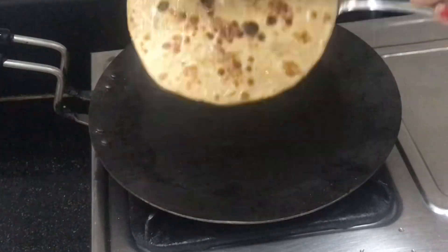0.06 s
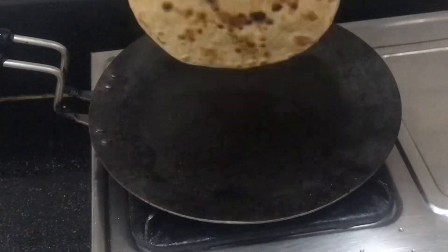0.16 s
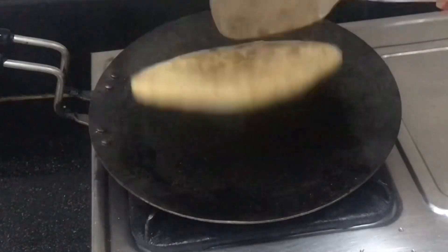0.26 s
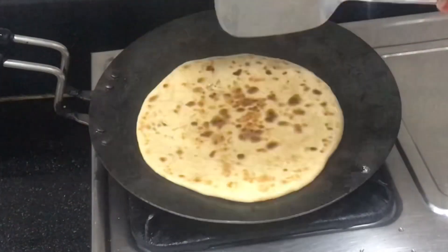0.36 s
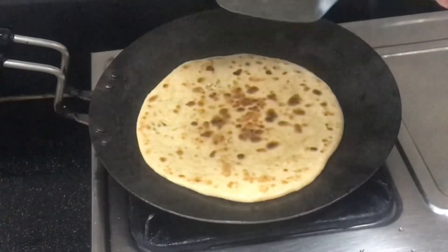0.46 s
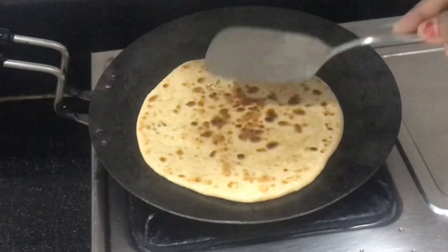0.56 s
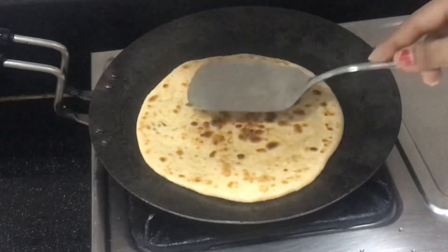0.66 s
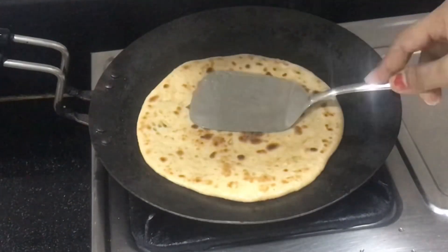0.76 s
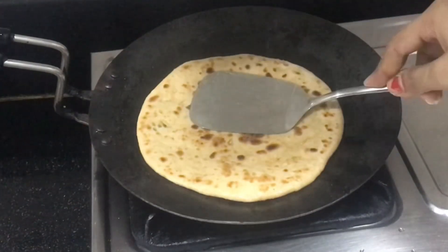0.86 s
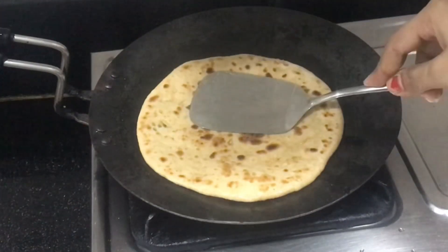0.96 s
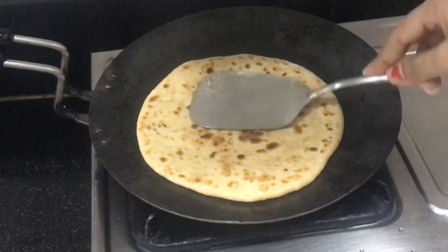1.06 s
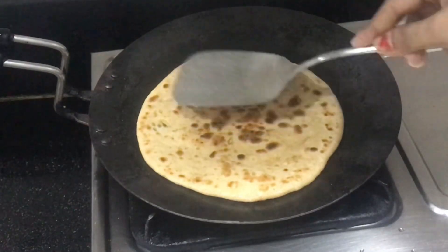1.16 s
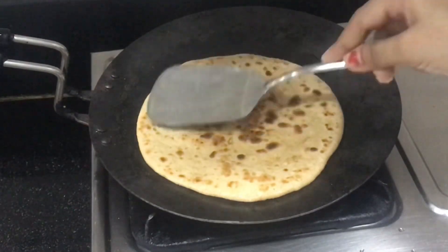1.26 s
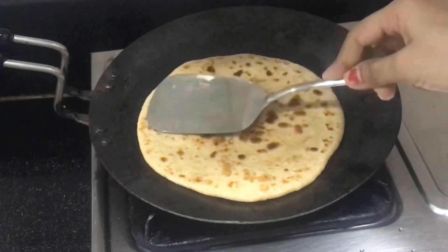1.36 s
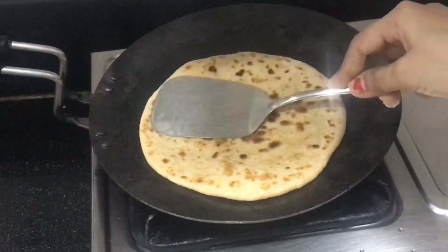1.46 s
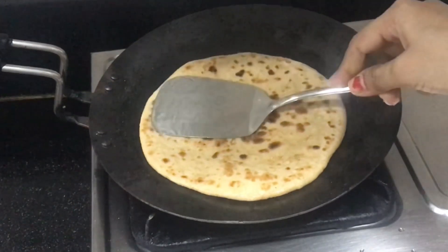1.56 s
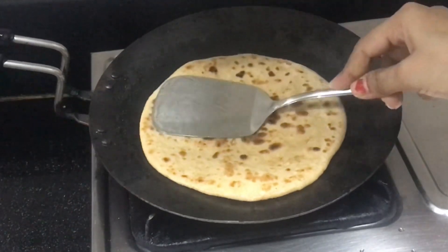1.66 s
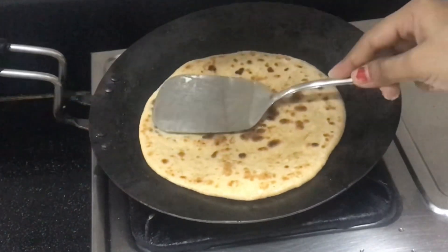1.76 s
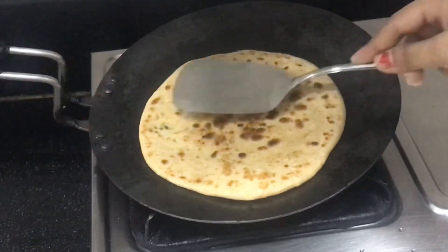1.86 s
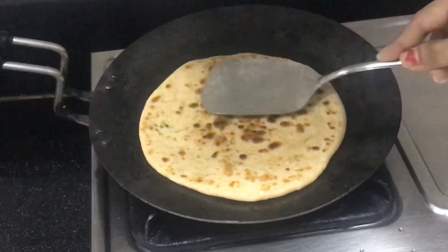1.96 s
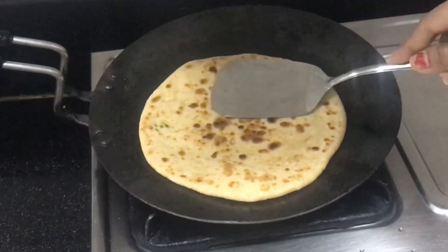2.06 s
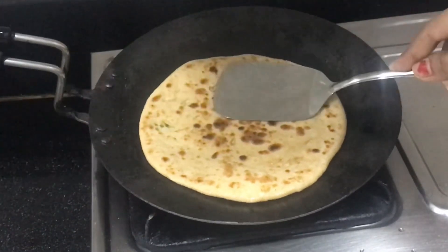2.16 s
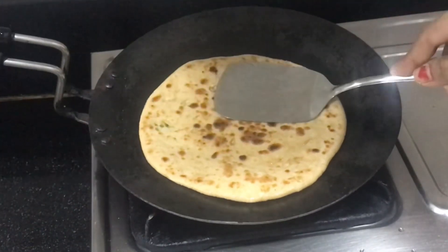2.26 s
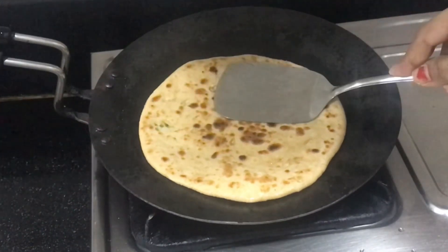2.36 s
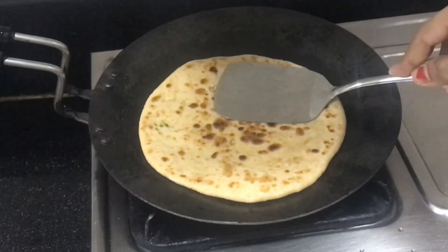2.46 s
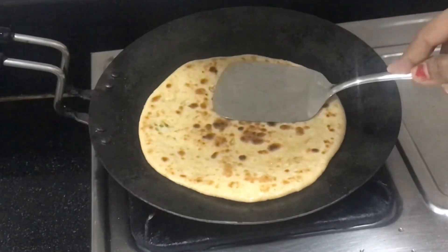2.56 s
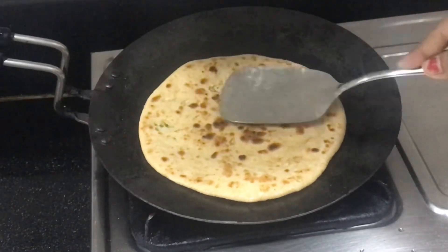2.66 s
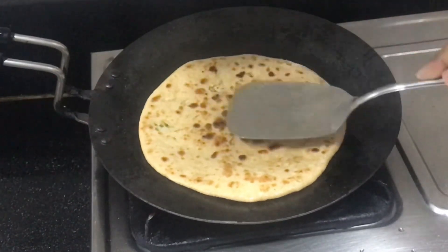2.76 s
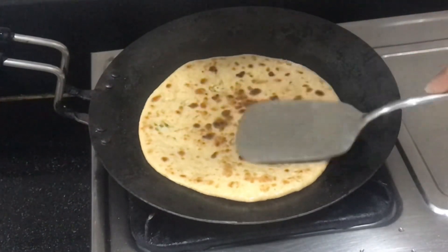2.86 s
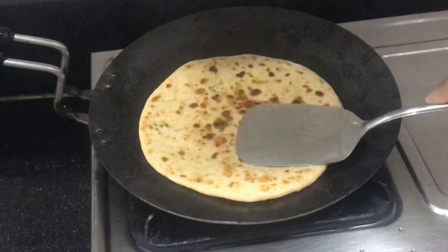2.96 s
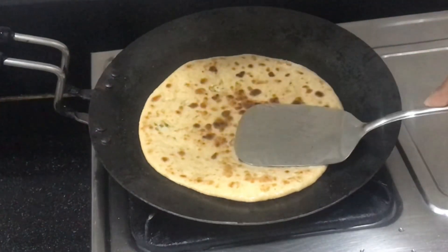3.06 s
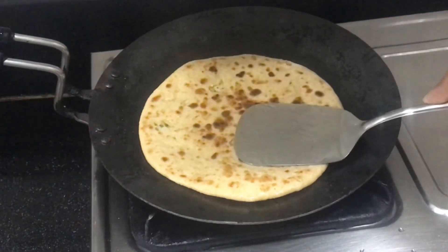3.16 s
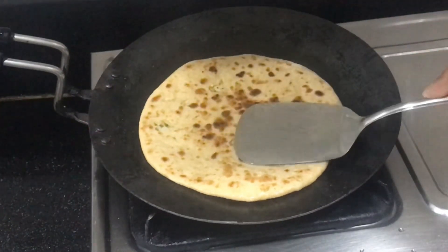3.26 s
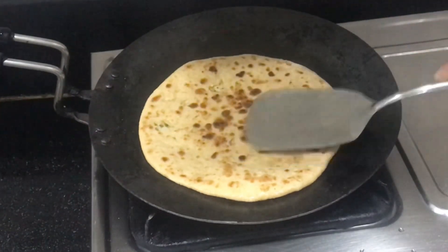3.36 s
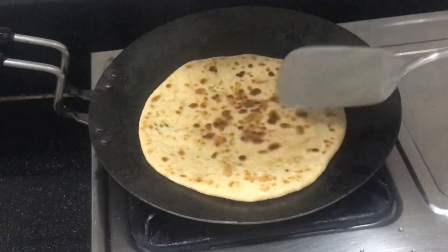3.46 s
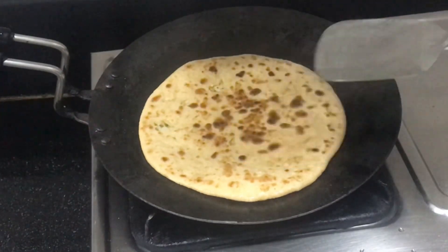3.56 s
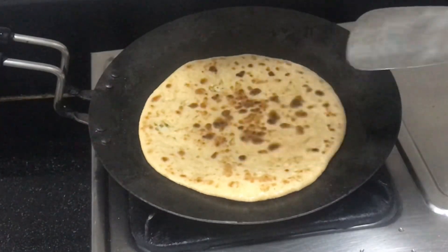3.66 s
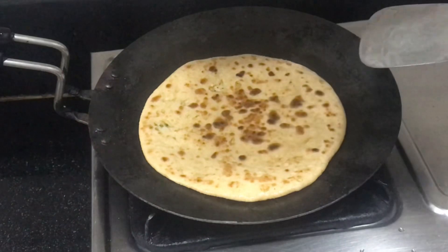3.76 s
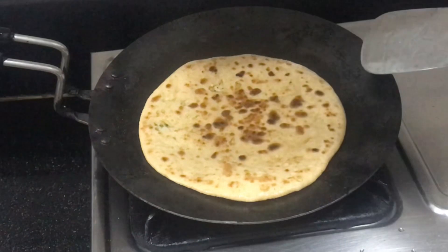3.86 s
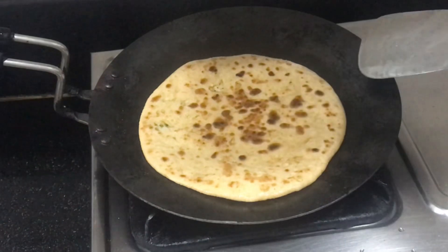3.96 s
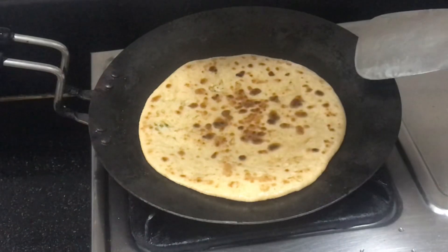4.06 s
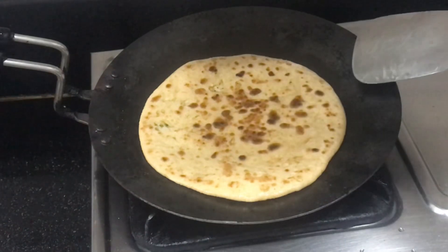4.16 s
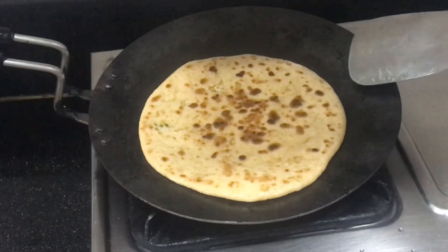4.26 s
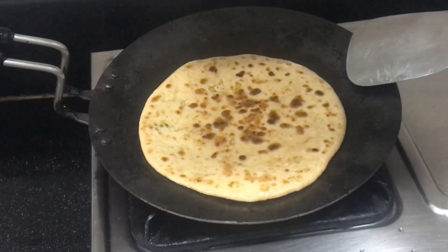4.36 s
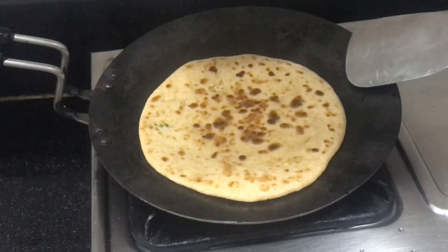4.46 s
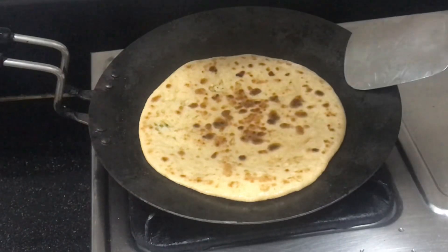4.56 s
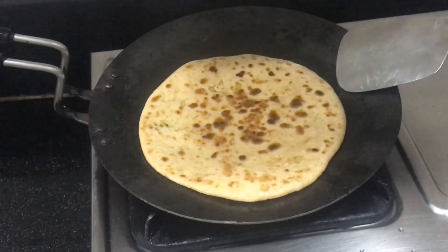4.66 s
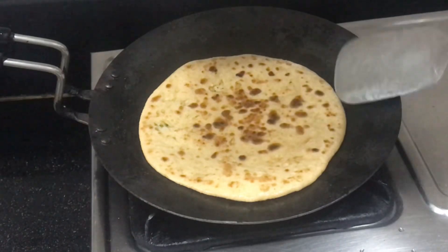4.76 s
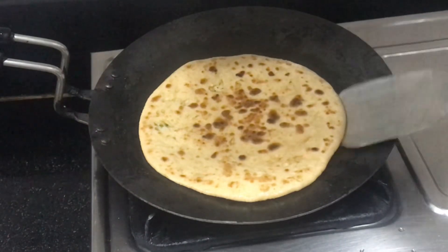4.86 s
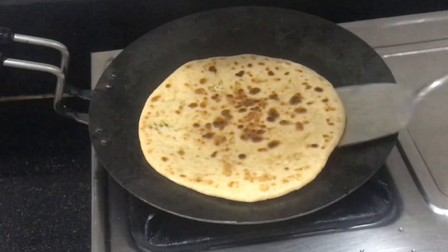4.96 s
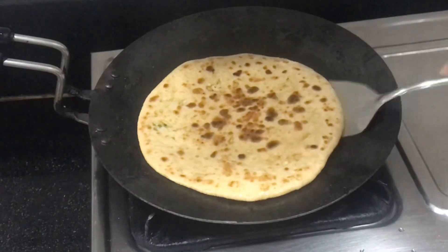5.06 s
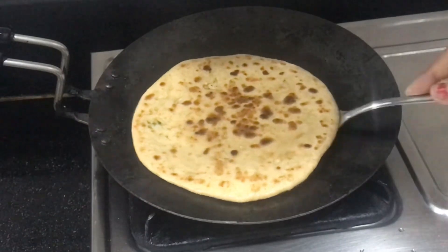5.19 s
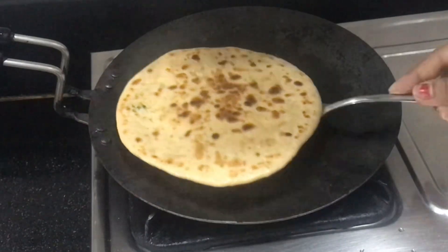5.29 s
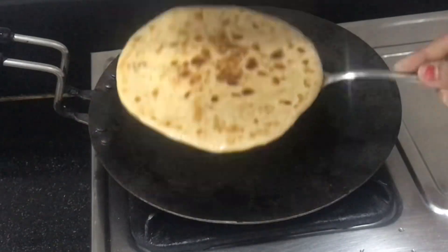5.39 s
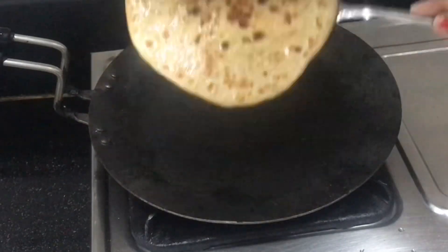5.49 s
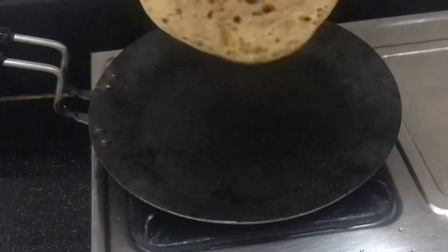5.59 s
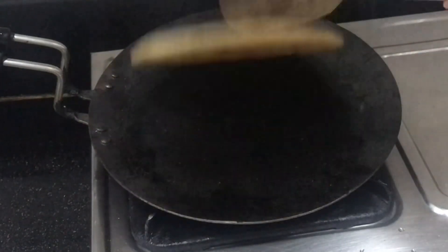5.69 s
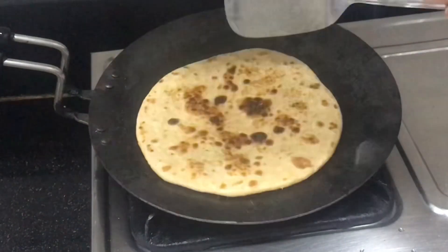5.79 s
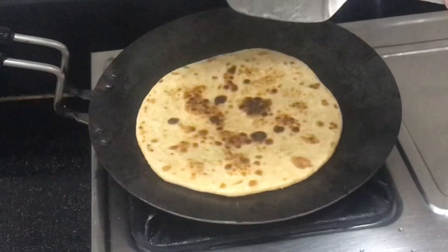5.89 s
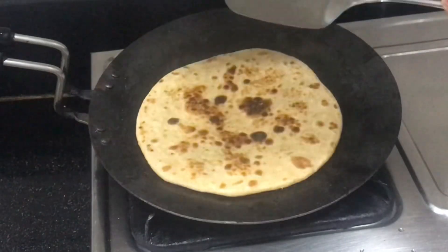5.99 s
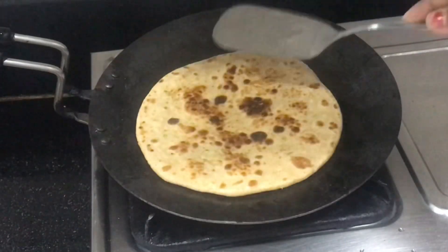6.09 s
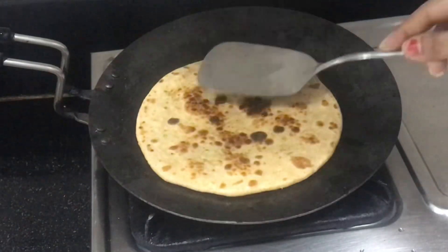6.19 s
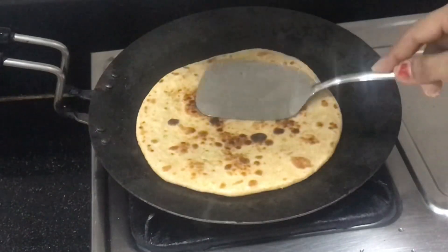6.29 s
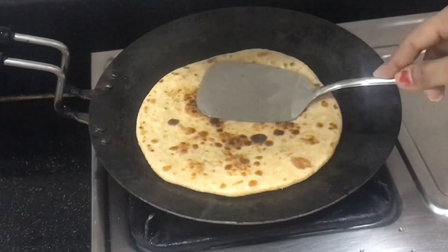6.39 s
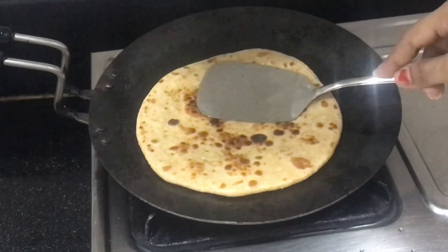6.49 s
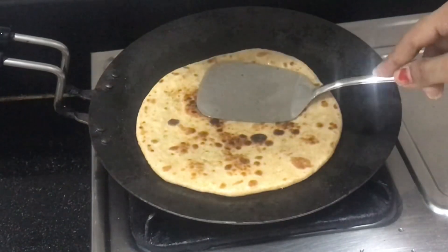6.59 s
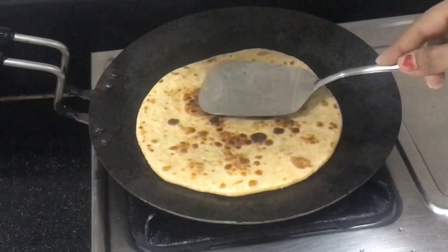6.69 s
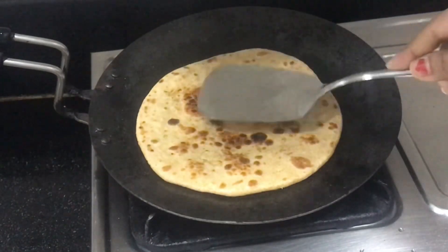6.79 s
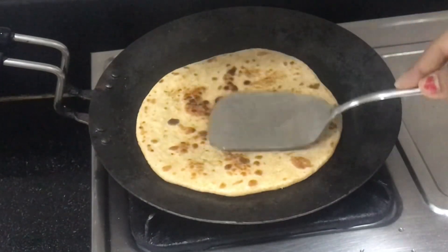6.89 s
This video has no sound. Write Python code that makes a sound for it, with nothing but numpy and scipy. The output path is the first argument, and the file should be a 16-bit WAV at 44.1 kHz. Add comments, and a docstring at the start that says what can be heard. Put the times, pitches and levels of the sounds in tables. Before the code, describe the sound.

Close in a home kitchen, a flatbread slaps onto a hot iron griddle and sizzles. A steel spatula pats and knocks it, each press making the oil flare brightly. Thin steam whistles sag and oil spits snap. The frying thins out, then the blade scrapes gritty and ringing under the bread, which flips and slaps down again before more soft pressing. Low burner rumble throughout.

```python
"""An oiled flatbread sizzles on a hot iron griddle while steam whistles thinly and a gas burner rumbles below.
A steel spatula pats and knocks the pan; the flipped bread slaps down twice, and later the blade scrapes under it.
Frying is made of random clicks, steam of sagging tones, and the burner of shaped noise with a wavering hum.
Blows are bursts of shaped noise plus ringing tones; oil spits are snaps with a brief sputter.
The scrape is a stream of random slips that rings the blade's resonances."""
import sys
import numpy as np
from scipy import signal
from scipy.fft import rfft, irfft
from scipy.io import wavfile

SR = 44100
rng = np.random.default_rng(int(sys.argv[2]) if len(sys.argv) > 2 else 0)


def transcribe(u):
    """Save the signal u as a 16-bit wav file named by the first command-line argument.

    u: samples, shape (n,) or (channels, n), limited to [-1, 1]; the rate is SR.
    q: integer samples, one column per channel.
    """
    v = np.clip(np.atleast_2d(u).T, -1, 1)
    q = np.round(v * 32767).astype(np.int16)
    wavfile.write(sys.argv[1], SR, q)


N = 305613
TIME = np.arange(N) / SR  # seconds
FREQS = np.fft.rfftfreq(2 * N, 1 / SR)  # Hz

# pushes of the blade under the bread:
# start_s, length_s, ringing_db (before the mix), rasp_db (gritty rasp compared with the ringing)
STROKES = [(4.634, 0.18, -40, -20), (4.782, .18, -35, -7), (4.96, 0.09, -27.5, -1.5),
           (5.155, 0.029, -31.5, -13), (5.273, 0.044, -49.5, 7.5)]


def undb(db):
    """Turn decibels into a gain."""
    return 10 ** (np.asarray(db) / 20)


def unit(x):
    """Scale to an rms (average strength) of 1."""
    return x / np.sqrt(np.mean(x ** 2))


def unit_gain(response):
    """Rms gain that a response gives to white noise."""
    return np.sqrt(np.mean(np.abs(response) ** 2))


def add(out, start_s, x):
    """Mix x into out from a given time."""
    i = max(int(start_s * SR), 0)
    out[i:i + len(x)] += x[:max(len(out) - i, 0)]


def filtered(x, response):
    """Apply a frequency response."""
    return irfft(rfft(x, 2 * N) * response)[:N]


def colour(points):
    """Frequency response through (pitch_hz, level_db) points that never sounds ahead of its input."""
    hz, db = np.transpose(points)
    level_db = np.interp(np.log(FREQS + 1), np.log(hz), db)
    # folding the cepstrum forward in time makes the response causal
    cepstrum = irfft(np.log(undb(level_db)))
    cepstrum[1:N] *= 2
    return np.exp(rfft(cepstrum[:N], 2 * N))


def resonances(rows):
    """Response of (pitch_hz, width_hz, level_db) resonances side by side."""
    total = 0
    for hz, width_hz, db in rows:
        loss = 1j * FREQS * width_hz
        total = total + undb(db) * loss / (hz * hz - FREQS ** 2 + loss)
    return total


def walk(rate):
    """Random wander along straight lines, `rate` new points a second, with a spread near 1."""
    knots = rng.standard_normal(4096)
    return 1.264 * np.interp(TIME * rate, np.arange(len(knots)), knots)


def clicks(rate, spread_db):
    """Random clicks, about `rate` a second, a few of them much larger than the rest."""
    size = undb(spread_db * np.minimum(rng.exponential(size=N), 5.5))
    happens = rng.random(N) < rate / SR
    return happens * rng.choice([-1, 1], N) * size


def ring(modes):
    """Struck tones (pitch_hz, starting rms level_db, t60_s to drop 60 dB) dying away."""
    t = TIME[:SR]
    total = 0
    for hz, db, t60 in modes:
        strength = np.sqrt(2) * undb(db - 60 * t / t60)
        total = total + strength * np.sin(2 * np.pi * (hz * t + rng.random()))
    return total


def kitchen(x, near_db, tail_db, near_t60=0.054, tail_t60=0.51):
    """Direct sound, quick reflections off pan and stove, and the tail of the room; keeps the power."""
    t = TIME[:SR // 2]
    response = (t == 0) * 1.
    for db, t60 in ((near_db, near_t60), (tail_db, tail_t60)):
        echo = rng.standard_normal(len(t)) * undb(-60 * t / t60) * (t > .0003)
        response = response + undb(db) * echo / np.linalg.norm(echo)
    return signal.fftconvolve(x, response / np.linalg.norm(response))[:N]


def swell(top_s, rise_s, fade_s):
    """Envelope that swells to 1 at its top and then dies away."""
    since = TIME - top_s
    return np.exp(-np.where(since < 0, (since / rise_s) ** 2, since / fade_s))


def bubbling(db, points, count=4):
    """Tiny steam bubbles burst all round the bread: fine fizz and coarser crackle, denser as it fries harder."""
    busy = undb(.6 * (db + 42))  # density is 1 at -42 dB
    gain = undb(db + 3.0 * walk(35))
    out = 0
    for _ in range(count):  # each place on the pan has its own reflections
        fizz = unit(clicks(2000 * busy, spread_db=2.5) / np.sqrt(busy))
        crackle = unit(clicks(110 * busy, spread_db=6.5) / np.sqrt(busy))
        bubbles = fizz + undb(-6.0) * crackle
        out = out + kitchen(bubbles * gain, near_db=-3.0, tail_db=-3)
    oil = colour(points)
    return filtered(out, oil / unit_gain(oil)) / np.sqrt(count)


def sizzle():
    """Frying that fades as the bread dries; every press squeezes out steam, flares brightly, then boils off."""
    # frying level from the start and after each landing: start_s, level_db (before the mix)
    frying_levels = [(0.0, -44.5), (0.36, -42), (5.8, -48.5)]
    # pressing or prising the bread makes the oil flare up: top_s, level_db (before the mix), swell_s, fade_s
    presses = [(0.846, -25, 0.032, 0.12), (2.36, -34, 0.085, 0.033), (3.1, -47.5, 0.07, 0.16),
               (4.98, -29.5, 0.096, .11), (5.299, -40.5, 0.14, 0.07), (5.905, -41, 0.016, 0.011),
               (6.408, -31, 0.06, 0.069)]
    # tone colour of the bursting oil bubbles: pitch_hz, level_db (relative)
    fizz_colour = [(290, -33), (500, -27), (677, -29), (1010, -14), (1660, -18), (3670, -12), (5050, -12.5),
                   (5920, -8.5), (7900, -10.5), (8610, -6.5), (12000, -6.5), (15800, 0)]
    # tone colour of the flares: pitch_hz, level_db (relative)
    flare_colour = [(1500, -30), (4000, -11.5), (6000, -7.5), (10000, -6), (12500, 1), (15800, 2.5)]
    drying_db_per_s = 2
    # pressed-out moisture boils off later, weaker and slower than the flare
    boil_lag_s, boil_db, boil_slower = 0.13, -12.5, 2.6

    frying, flare, boil = np.zeros(N), 1e-4, 0
    for start_s, db in frying_levels:
        fading = undb(db - drying_db_per_s * (TIME - start_s))
        frying = np.where(TIME >= start_s - .002, fading, frying)
    for top_s, db, rise_s, fade_s in presses:
        flare = flare + undb(db) * swell(top_s, rise_s, fade_s)
        slow_swell = swell(top_s + boil_lag_s, rise_s * boil_slower, fade_s * boil_slower)
        boil = boil + undb(db + boil_db) * slow_swell
    frying_db = 20 * np.log10(np.hypot(frying, boil) + 1e-6)
    flare_db = 20 * np.log10(flare)
    steady = undb(2.65) * bubbling(frying_db, fizz_colour)
    return steady + undb(2.5) * bubbling(flare_db, flare_colour, count=2)


def whistles():
    """Steam through pinholes in the crust: thin wavering tones that sag as the steam pressure drops."""
    # start_s, length_s, start_pitch_hz (before wavering), level_db (peak before flutter),
    # sag (share of the pitch lost by the end)
    steam_jets = [(0.0, 0.54, 4270, -58.5, 0.065), (0.484, 0.39, 3610, -55, .01),
                  (0.579, 0.21, 3880, -59, 0.052), (1.078, 0.24, 3750, -51.5, .07),
                  (1.274, 0.19, 3590, -55.5, 0.011), (1.825, 0.14, 4880, -62.5, 0.057),
                  (1.9, 0.087, 9494, -55, .04), (3.218, 0.15, 9600, -58, 0.0092),
                  (3.812, 0.08, 5340, -58, 0.0078), (4.087, 0.48, 15500, -50, 0.16)]
    out = np.zeros(N)
    waver = 1 + 0.0078 * walk(35) + 0.0057 * walk(600)
    flutter = undb(2.2 * walk(45))
    for start_s, length_s, start_hz, db, sag in steam_jets:
        u = np.linspace(0, 1, int(length_s * SR))  # progress through the whistle
        waver_here = np.roll(waver, -int(start_s * SR))[:len(u)]
        hz = start_hz * (1 - sag * u) * waver_here
        tone = np.sin(2 * np.pi * np.cumsum(hz) / SR)
        add(out, start_s, undb(db) * np.sqrt(4 * u * (1 - u)) * tone)
    return out * flutter


def burner():
    """Low flame rumble from shaped noise, and a wavering motor hum in the kitchen."""
    # tone colour of the rumble: pitch_hz, level_db (relative)
    flame_colour = [(13, -58), (22, -28.5), (76, -1.5), (146, -19), (231, -20.5), (269, -16.5), (444, -24),
                    (506, -27), (657, -27.5), (930, -26.5), (1260, -33), (2760, -37), (3150, -29.5),
                    (4000, -31), (5200, -68), (8800, -120)]
    flame_db, hum_db, hum_hz = -58, -60, 85.1  # middle values; all three wander
    rumble = unit(filtered(rng.standard_normal(N), colour(flame_colour)))
    flame = rumble * undb(flame_db + 1.43 * walk(6))
    wavering_hz = hum_hz * (1 + 0.012 * walk(4.9))
    hum = np.sqrt(2) * np.sin(2 * np.pi * np.cumsum(wavering_hz) / SR)
    return flame + hum * undb(hum_db + 4.9 * walk(4.9))


def contacts():
    """Every touch on the pan: (start_s, thud_db, clack_db, boom_db, splash_db, contact_s); harder pats are shorter."""
    # the flipped bread lands on one edge, then the rest flops down: start_s, thud_db (before the mix),
    # boom_db (stove top compared with the thud), contact_s, flop_after_s
    slaps = [(0.3533, -25, 4.5, 0.0051, 0.042), (5.793, -28.5, -2.5, 0.0083, 0.025)]
    # the spatula pats and knocks: start_s, thud_db (before the mix), clack_db (compared with the thud),
    # second_knock_after_s (until a softer second contact, 0 if there is none)
    pats = [(0.282, -44.5, 6, 0.011), (0.474, -49.5, 12, 0.043), (0.743, -51, -6, 0), (0.826, -44, -1, 0),
            (1.323, -54.5, 9, 0.0032), (1.358, -47, -2, 0), (1.443, -55, 8, 0), (1.675, -33.5, 6, 0.0031),
            (2.031, -21, 2, 0.039), (2.196, -26, -0.5, 0.069), (2.534, -51.5, -15, 0),
            (2.921, -54, -9.5, 0), (3.014, -53.5, -0.5, 0.0041), (3.186, -50, -4.5, 0.049),
            (5.723, -58.5, 17.5, 0.025), (5.986, -55, 4, 0), (6.305, -48, 6.5, 0), (6.387, -41.5, -16, 0)]
    slap_clack_db, slap_wet_db = -1.5, 1.5  # compared with the thud
    # thud compared with the landing; clack and splash compared with that thud
    flop_db, flop_clack_db, flop_wet_db, flop_contact_s = -5, 3, 0.5, 0.0025
    pat_wet_db = 1  # splash compared with the clack
    # contact time of a pat at the reference level, and the rise in level that halves it
    pat_contact_s, pat_reference_db, contact_halving_db = 0.00086, -24, 18
    # second thud compared with the pat; clack and splash compared with that thud
    second_db, second_clack_db, second_wet_db, second_contact_s = -5.5, -4, -25, 0.004

    rows = []
    for s, db, boom_db, contact_s, after_s in slaps:
        rows.append((s, db, db + slap_clack_db, db + boom_db, db + slap_wet_db, contact_s))
        flop = db + flop_db
        rows.append((s + after_s, flop, flop + flop_clack_db, flop, flop + flop_wet_db, flop_contact_s))
    for s, db, clack_db, after_s in pats:
        contact_s = pat_contact_s * 2 ** ((pat_reference_db - db) / contact_halving_db)
        rows.append((s, db, db + clack_db, db, db + clack_db + pat_wet_db, contact_s))
        if after_s > 0:
            second = db + second_db
            clack, splash = second + second_clack_db, second + second_wet_db
            rows.append((s + after_s, second, clack, second, splash, second_contact_s))
    return rows


def blow_part(column, response, lag_s, t60, tail_db, tail_t60):
    """One part of all blows: noise swells during the contact, drops fast, and lingers in the room."""
    power, t = np.zeros(N), TIME[:SR]
    for row in contacts():
        start_s, level_db, contact_s = row[0], row[column], row[-1]
        rise = 1 - np.exp(-(t / (contact_s + lag_s)) ** 2)
        shape = rise * (undb(-60 * t / t60) + undb(tail_db - 60 * t / tail_t60))
        add(power, start_s, (undb(level_db) * shape / shape.max()) ** 2)
    return np.sqrt(power) * unit(filtered(rng.standard_normal(N), response))


def blows():
    """The wet splash swells fastest, then the clack of iron, then the thud of the stove top, which rings on."""
    # resonances of the pan on its stand: pitch_hz, width_hz, level_db (relative)
    pan_modes = [(252.5, 31, -6.5), (1008, 12, -5.5), (1932, 37, -5.5), (2200, 49, -22), (2470, 27, -25),
                 (2750, 98, -14), (3344, 35, -6.5), (3850, 170, -19), (4330, 20, -1)]
    # low ringing of pan and stove top: pitch_hz, level_db (compared with the boom), t60_s (to drop 60 dB)
    stove_modes = [(71.7, -17.5, 0.66), (126, -21.5, 0.56), (173.8, -18.5, 0.88), (234.4, -16, 0.25),
                   (272, -9.5, 0.4), (340, -17.5, 0.41), (423, -8.5, 0.27), (527, -17, 0.34),
                   (653, -11.5, 0.31), (910, -5, 0.18), (1213, -9, 0.15)]
    # tone colours of the three parts of a blow, each: pitch_hz, level_db (relative)
    thud_colour = [(30, -7), (110, -9.5), (220, 1), (450, -4.5), (800, 1.5), (1300, -1), (2000, -13),
                   (4000, -65)]
    clack_colour = [(500, -22.5), (1100, -6.5), (1800, -1.5), (3400, 2.5), (4600, -6.5), (7000, -12.5),
                    (14000, -68)]
    splash_colour = [(2000, -8), (4500, -2.5), (6500, -1.5), (10000, -4), (15500, 2.5)]

    pan = 0.3 + resonances(pan_modes)
    # the first argument picks the part's level in a contacts() row
    thud = blow_part(1, colour(thud_colour) * pan, lag_s=0.0073, t60=0.17, tail_db=-15, tail_t60=0.57)
    clack = blow_part(2, colour(clack_colour) * pan, lag_s=0.00027, t60=0.11, tail_db=-15.5, tail_t60=0.5)
    splash = blow_part(4, colour(splash_colour), lag_s=0.00015, t60=0.012, tail_db=-22.5, tail_t60=0.26)
    stove = np.zeros(N)
    for start_s, _, _, boom_db, _, contact_s in contacts():
        rise = 1 - np.exp(-TIME[:SR] / (contact_s + 0.013))
        add(stove, start_s, undb(boom_db) * ring(stove_modes) * rise)
    return undb(-2.0) * thud + undb(-1.5) * clack + undb(4.0) * splash + undb(-1.0) * stove


def free_blade():
    """The blade rings twice: a short clink stifled by the bread, then a free ring that fades slowly."""
    # start_s, level_db, damping_t60_s (extra fading, time to drop 60 dB; long means hardly any)
    blade_rings = [(0.283, -39, 0.4), (5.229, -42, 9.0)]
    # tones of the blade: pitch_hz, level_db (relative), t60_s (before the extra fading)
    free_modes = [(2022, 0, 0.11), (1976, -17, 1.0), (2460, -8.5, 0.39), (3180, -6.5, 1), (3316, -11, .1),
                  (4650, -9, 0.24)]
    out = np.zeros(N)
    for start_s, db, t60 in blade_rings:
        add(out, start_s, undb(db - 60 * TIME[:SR] / t60) * ring(free_modes))
    return out


def spits():
    """A larger droplet of oil bursts with a sharp snap and a brief sputter."""
    # the largest spits: start_s, level_db (of the snap, before colour, room and mix)
    oil_spits = [(0.5766, -19), (0.5965, -22), (1.004, -14.5), (1.257, -23), (2.345, -20.5), (2.391, -20),
                 (2.4096, -18), (2.589, -16.5), (2.811, -24.5), (3.004, -35), (3.1181, -28), (4.217, -30.5),
                 (5.2282, -10.5), (5.2638, -13.5), (5.3445, -18), (5.515, -21.5), (5.9236, -17),
                 (6.5278, -20.5), (6.761, -24), (6.858, -22)]
    out, t = np.zeros(N), TIME[:SR // 50]
    for start_s, db in oil_spits:
        sputter = rng.standard_normal(len(t)) * np.exp(-t / 0.0037)
        snap = t == 0
        burst = snap + undb(5.5) * sputter / np.linalg.norm(sputter)
        add(out, start_s + 0.00074, undb(db) * burst)
    oil = colour([(600, -20), (2500, -17.5), (6000, -9.5), (11000, -4), (15000, 4)])
    return undb(9.5) * kitchen(filtered(out, oil), near_db=-15, tail_db=-5.0)


def pushes():
    """Gains of ringing and rasp: each stroke bites, holds and dies away."""
    attack_s, release_s = 0.007, 0.041
    ringing, grit = 0, 0
    for start_s, length_s, db, rasp_db in STROKES:
        bite = np.clip((TIME - start_s) / attack_s, 0, 1)
        push = bite * np.exp(-np.maximum(TIME - start_s - length_s, 0) / release_s)
        ringing = np.maximum(ringing, undb(db) * push)
        grit = np.maximum(grit, undb(db + rasp_db) * push)
    return ringing, grit


def mode_groups(count):
    """The blade's resonances dealt out like cards into groups."""
    # resonances of the blade held against the pan: pitch_hz (before bending), width_hz, level_db (relative)
    blade_modes = [(1014, 73, -17.5), (1603, 19, -16), (1688, 55, -7.5), (1940, 18, -2), (2070, 33, -6),
                   (2420, 103, -12), (2805, 41, 0), (2980, 31, 0), (3163, 62, -1), (3354, 20, 3.5),
                   (3750, 125, -7), (4430, 66, -2.5), (4640, 8.3, 4.5), (5240, 63, -4.5), (5710, 31, 0),
                   (5870, 50, -5.5), (6350, 110, -16), (6930, 17, -1), (7670, 64, -10), (8040, 43, -15),
                   (8500, 75, -6), (9370, 48, -3.5), (11340, 72, -2), (11400, 190, -16), (13500, 250, -6),
                   (14600, 250, -10)]
    return [blade_modes[k::count] for k in range(count)]


def scrape():
    """The steel edge catches and slips on the rough iron; each slip rings the blade."""
    # tone colour of the gritty rasp: pitch_hz, level_db (relative)
    rasp_colour = [(300, -47), (1000, -21), (1700, -3), (3100, 7), (4100, -27), (5600, 3.5), (10000, 8),
                   (13000, 7), (15800, 1)]
    ringing, grit = pushes()
    first_s = STROKES[0][0]
    slips = unit(clicks(2500, spread_db=1.0) * undb(1.65 * walk(70)))
    steel = 0
    for group in mode_groups(count=5):
        # the contact point travels: modes take turns and bend a little in pitch
        bent = np.cumsum(1 + .007 * walk(12))  # uneven reading position, in samples
        tone = filtered(slips, resonances(group))
        bent += first_s * SR - np.interp(first_s, TIME, bent)  # lines up at the first stroke
        steel = steel + np.interp(bent, np.arange(N), tone) * undb(2.3 * walk(18))
    rasp = unit(filtered(slips, colour(rasp_colour)))
    return kitchen(unit(steel) * ringing + rasp * grit, near_db=-13, tail_db=-4)


def scene():
    """Everything at the stove, mixed to one channel."""
    frying = sizzle() + whistles() + burner()
    handling = blows() + free_blade() + spits() + scrape()
    return (frying + handling)[None]


def record(dry):
    """A steep low-pass filter cuts the treble above top_hz."""
    top_hz = 15850
    low_pass = signal.ellip(10, .2, 70, top_hz, fs=SR, output="sos")
    return signal.sosfilt(low_pass, dry)


dry = scene()
out = record(dry)
transcribe(out)
```